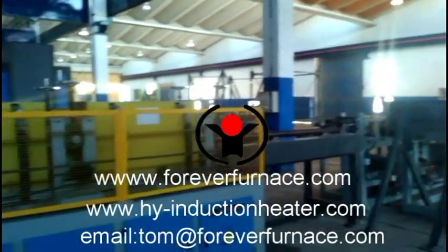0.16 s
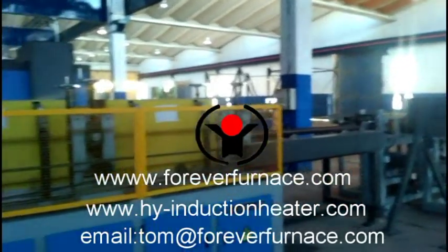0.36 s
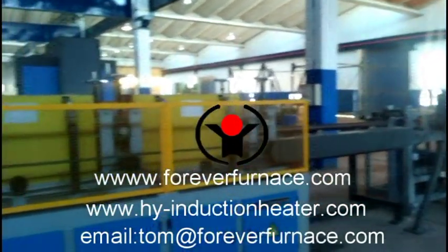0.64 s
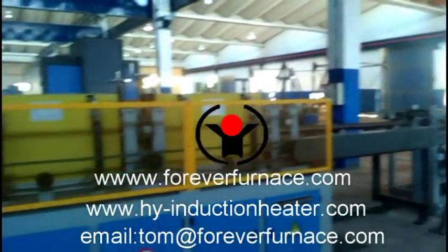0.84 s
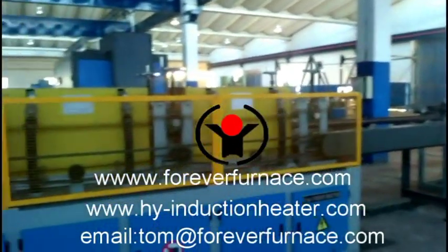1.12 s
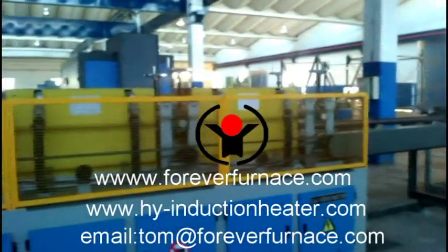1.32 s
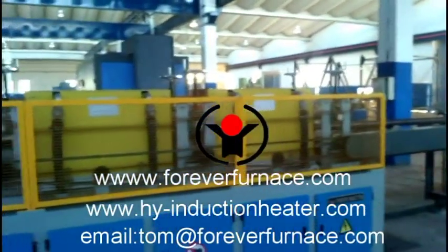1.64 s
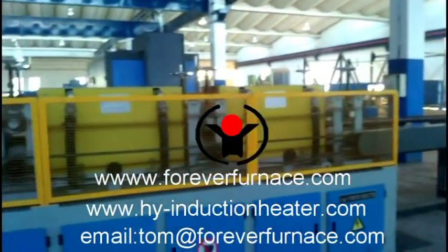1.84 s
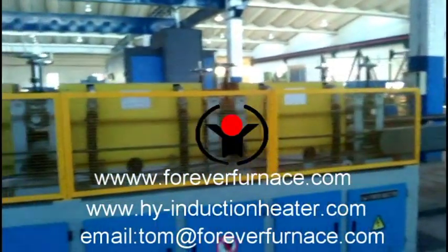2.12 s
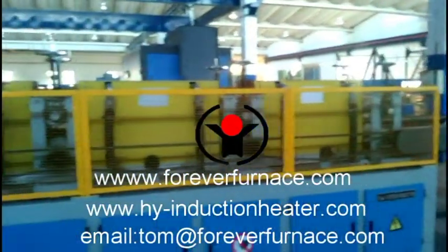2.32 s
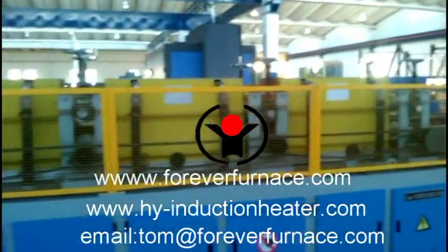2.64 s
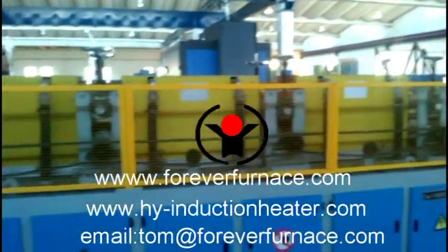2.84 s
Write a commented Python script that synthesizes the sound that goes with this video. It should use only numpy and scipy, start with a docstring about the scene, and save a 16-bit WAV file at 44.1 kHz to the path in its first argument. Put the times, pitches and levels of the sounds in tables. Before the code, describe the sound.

Loud steady machinery roar with a wavering high electric whine fills a large factory hall

```python
"""A broad roar of fans and pumps surrounds a small hand-held microphone throughout, in a large factory hall.
It is coloured noise whose bands drift in level, with a crowd of faint sine tones blended in.
Motor tones swell and fade as the microphone slowly turns and moves through the hall's standing waves.
The heater's supply whines; a second whine and the rectifier hum sit below it, all as sines.
Fast gain control flattens the level."""
import sys
import numpy as np
from scipy import signal
from scipy.fft import rfft, irfft
from scipy.io import wavfile

SR = 44100
rng = np.random.default_rng(int(sys.argv[2]) if len(sys.argv) > 2 else 0)


def bounce(signal):
    """Save signal as a 16-bit WAV file at the path given by the first command-line argument."""
    frames = np.transpose(np.atleast_2d(signal))
    limited = np.clip(frames, -1, 1)
    pcm = np.round(limited * 32767).astype(np.int16)
    wavfile.write(sys.argv[1], SR, pcm)


def volts_from_decibels(level):
    """Turn decibel levels (scalar or array-like) into linear amplitude factors."""
    exponent = np.asarray(level, float) / 20
    return 10 ** exponent


N = 130977

# Spectrum of the roar, only its shape counts: pitch_hz, relative_level_db (per Hz)
ROAR_SPECTRUM = [(15, -74), (30, -52), (64, -45), (125, -24.5), (252, -9), (300, -5), (443, -6),
                 (490, -2.5), (700, -3.5), (1200, -2.5), (1700, -4.5), (2200, -7.5), (2500, -11.5),
                 (3570, -18.5), (4500, -28), (5350, -36.5), (6960, -53), (8000, -59.5), (9000, -66.5),
                 (9700, -76), (10400, -82), (14000, -88), (20000, -100)]
# Treble of the roar, which jumps up and sags again: time_s, level_change_db
TREBLE_LEVEL = [(0, 1.5), (.3, 0.5), (.5, 0.5), (.74, -3.5), (.81, 1.5), (1.15, -2), (1.22, 2.5), (1.38, 1),
                (1.5, -0.5), (1.73, -2), (1.8, 2), (2.06, -1), (2.13, 1.5), (2.3, 0.5), (2.45, -0.5),
                (2.7, 0), (2.97, -2)]
# Motor tones that swell at the microphone, before gain control:
# peak_s, pitch_hz, level_db (rms at the peak), half_length_s
MOTOR_SWELLS = [(.15, 1187, -32.5, 0.14), (0.1, 1553, -31.5, .1), (.35, 838, -29, 0.14),
                (.33, 1254, -30.5, 0.11), (0.36, 730, -32.5, .1), (.58, 481, -26.5, 0.099),
                (0.24, 1600, -34, .1), (.45, 2110, -38, 0.11), (.85, 579, -33, 0.11), (0.72, 969, -33, .1),
                (.89, 888, -30.5, 0.05), (1.3, 1543, -33.5, 0.092), (1.05, 2019, -36.5, .1),
                (1.4, 1179, -31.5, 0.29), (1.55, 810, -31, 0.16), (1.4, 1225, -33.5, 0.087),
                (1.7, 1378, -33.5, .1), (2.3, 2600, -38, .1), (2.2, 2800, -40, 0.074), (2.2, 2546, -39, .1),
                (1.83, 1222, -29.5, .1), (1.84, 1187, -31.5, 0.088), (1.83, 1500, -31, 0.11),
                (1.79, 1443, -32.5, .1), (2.1, 580, -34.5, 0.069), (2.075, 1039, -31.5, 0.082),
                (2.25, 1600, -40.5, 0.12), (2.21, 2660, -40.5, 0.14), (2.65, 1063, -30.5, 0.089),
                (2.61, 1665, -32.5, .08), (2.91, 757, -27.5, 0.07), (2.62, 755, -31, .12),
                (2.92, 820, -33.5, 0.17), (2.68, 1100, -33, 0.05), (2.88, 900, -30.5, .12),
                (2.9, 1185, -31, 0.15), (1.11, 1540, -31, .06), (2.52, 1610, -33, 0.046),
                (2.52, 1000, -33.5, 0.062), (.65, 1100, -34.5, 0.11)]
# Steady tones of the heater's supply, before gain control:
# time_s, whine_hz, whine_db, lower_whine_hz, lower_whine_db, rectifier_hum_db
SUPPLY_TONES = [(0.0, 2261.8, -41, 1647, -27, -38), (0.17, 2263, -31.5, 1647, -25, -39.5),
                (0.35, 2262, -34, 1647, -28, -36.0), (0.52, 2261, -32, 1649, -32.5, -34.5),
                (0.7, 2263, -24, 1651, -28.5, -34), (0.87, 2264, -27, 1651, -37, -35),
                (1.05, 2264, -24.5, 1651, -38.5, -32), (1.22, 2262, -23.5, 1649.6, -38, -31.5),
                (1.31, 2261, -26.5, 1650, -37, -31), (1.42, 2261, -36, 1648, -33, -34.5),
                (1.57, 2264, -30, 1650.4, -32.1, -35.5), (1.75, 2264, -32.5, 1648, -32.5, -37),
                (1.92, 2262, -31.5, 1652, -32, -37), (2.1, 2264, -39, 1655, -35, -34),
                (2.27, 2263, -36, 1648.9, -43.6, -31.5), (2.45, 2270, -31, 1642, -41.5, -36),
                (2.62, 2265.5, -28.5, 1645, -37.9, -31), (2.72, 2266, -32.5, 1650, -39, -32.5),
                (2.8, 2265.8, -41, 1652, -41.3, -33), (2.97, 2277, -42, 1657, -42, -32)]
# Octave above the whine, before gain control: time_s, level_db
WHINE_OCTAVE = [(0, -65.5), (.6, -68.5), (1.2, -62.5), (1.7, -60.5), (2.0, -54), (2.3, -54), (2.6, -61),
                (2.97, -60)]
# Upper partials of the whine, before gain control: multiple_of_whine_pitch, level_db
WHINE_PARTIALS = [(3, -82), (4, -93)]


def rms_one(x):
    """Scale to rms 1."""
    return x / np.sqrt(np.mean(x ** 2) + 1e-20)


def in_time(table):
    """Table columns after the first, the times, as curves over the samples."""
    time_s, *columns = np.transpose(table)
    return [np.interp(np.arange(N) / SR, time_s, column) for column in columns]


def drift(rate_hz):
    """Slow random wander of spread 1: noise through two equal one-pole low-passes at rate_hz."""
    step = 100  # samples between the random draws
    pole = np.exp(-2 * np.pi * rate_hz * step / SR)
    noise = rng.standard_normal(N // step + 1002)
    slow = signal.lfilter([1], [1, -2 * pole, pole ** 2], noise)[1000:]  # settled part only
    slow = rms_one(slow - slow.mean())
    return np.interp(np.arange(N) / step, np.arange(len(slow)), slow)


def tone(hz, db):
    """A sine of given pitch and rms level, both of which may move; its start phase is random."""
    cycles = np.cumsum(hz + np.zeros(N)) / SR + rng.random()
    return np.sqrt(2) * volts_from_decibels(db) * np.sin(2 * np.pi * cycles)


def roar_level_db(hz):
    """Relative level of the roar's spectrum at a pitch, read on a logarithmic pitch scale."""
    spectrum_hz, level_db = np.transpose(ROAR_SPECTRUM)
    return np.interp(np.log(np.maximum(hz, 1)), np.log(spectrum_hz), level_db)


def treble_dip_db(hz, shared):
    """Short dips that make the top flicker: deeper with height, partly in all high bands at once."""
    from_hz, db_per_octave, rate_hz = 4130, 60, 14.0
    shared_part, threshold = 0.41, 0.55  # a higher threshold makes dips rarer
    wander = shared_part * shared + (1 - shared_part) * drift(rate_hz)
    dip = np.maximum(wander - threshold, 0)
    return db_per_octave * max(np.log2(hz / from_hz), 0) * dip


def roar():
    """Fans and pumps as coloured noise in overlapping fifth-octave bands, each drifting in level; rms 1."""
    lowest_hz, bands_per_octave, treble_hz = 100, 5, 2400
    slow_db, slow_hz, fast_db, fast_hz = 1.0, 1.2, 1.0, 6.8  # drift of each band
    f = np.fft.rfftfreq(N, 1 / SR)
    noise = rfft(rng.standard_normal(N)) * volts_from_decibels(roar_level_db(f))
    # the outermost bands also hold what lies beyond them
    place = bands_per_octave * np.log2(np.clip(f, lowest_hz, 12800) / lowest_hz)
    treble_db, = in_time(TREBLE_LEVEL)
    shared = drift(14.0)  # the wander common to all the dips
    out = 0
    for k in range(36):
        hz = lowest_hz * 2 ** (k / bands_per_octave)
        band = irfft(noise * np.clip(1 - abs(place - k), 0, 1), N)
        # the treble curve fades in over the octave below treble_hz
        bright = np.clip(np.log2(2 * hz / treble_hz), 0, 1)
        level_db = slow_db * drift(slow_hz) + fast_db * drift(fast_hz)
        level_db = level_db + bright * treble_db - treble_dip_db(hz, shared)
        out = out + band * volts_from_decibels(level_db)
    return rms_one(out)


def motor_crowd(count=130):
    """Faint motor tones at scattered pitches, more of them low, swelling at random; rms 1."""
    low_hz, high_hz, swell_db, swell_hz = 219.7, 4996, 4.0, 2.5
    pitches = low_hz + (high_hz - low_hz) * rng.random(count) ** 1.5
    return rms_one(sum(tone(hz, roar_level_db(hz) + swell_db * drift(swell_hz)) for hz in pitches))


def motors():
    """Loud motor swells in the standing waves: sines shaky in pitch and level, under a bell-shaped level."""
    pitch_spread_hz, level_spread_db, rate_hz = 3.5, 2.5, 9.0
    t = np.arange(N) / SR
    out = 0
    for peak_s, hz, db, half_s in MOTOR_SWELLS:
        shaky_hz = hz + pitch_spread_hz * drift(rate_hz)
        shaky_db = db + level_spread_db * drift(rate_hz)
        bell = np.exp(-0.5 * ((t - peak_s) / half_s) ** 2)
        out = out + tone(shaky_hz, shaky_db) * bell
    return out


def supply():
    """Heater supply: two whines, rectifier hum and the whine's octave flutter; higher partials waver."""
    hum_hz = 298.3
    flutter_db, flutter_hz, waver_db, waver_hz = 0.5, 4.0, 3.0, 1.5
    whine_hz, whine_db, low_hz, low_db, hum_db = in_time(SUPPLY_TONES)
    octave_db, = in_time(WHINE_OCTAVE)
    steady = [(whine_hz, whine_db), (low_hz, low_db), (hum_hz, hum_db), (2 * whine_hz, octave_db)]
    out = sum(tone(hz, db + flutter_db * drift(flutter_hz)) for hz, db in steady)
    for multiple, db in WHINE_PARTIALS:
        out = out + tone(multiple * whine_hz, db + waver_db * drift(waver_hz))
    return out


def scene():
    """Everything in the hall summed at the microphone, as one channel."""
    roar_db, crowd_db = -19.5, -11.5  # the crowd is relative to the roar
    background = volts_from_decibels(roar_db) * (roar() + volts_from_decibels(crowd_db) * motor_crowd())
    return (background + motors() + supply())[None]


def top_cut(x):
    """Nothing passes above the cut-off."""
    return signal.sosfilt(signal.butter(12, 14000, fs=SR, output="sos"), x)


def record(dry):
    """Fast gain control: power smoothed forwards and backwards sets a gain toward the target level."""
    target_db, share, smoothing_s = -18, 0.94, 0.008  # share of the level error taken out
    pole = np.exp(-1 / (smoothing_s * SR))
    b, a = [1 - pole], [1, -pole]
    power = signal.lfilter(b, a, dry ** 2, zi=[[volts_from_decibels(2 * target_db)]])[0]
    power = signal.lfilter(b, a, power[:, ::-1], zi=power[:, -1:])[0][:, ::-1]
    level_db = 10 * np.log10(power + 1e-12)
    mix = dry * volts_from_decibels(share * (target_db - level_db))
    return top_cut(mix)


dry = scene()
out = record(dry)
bounce(out)
```